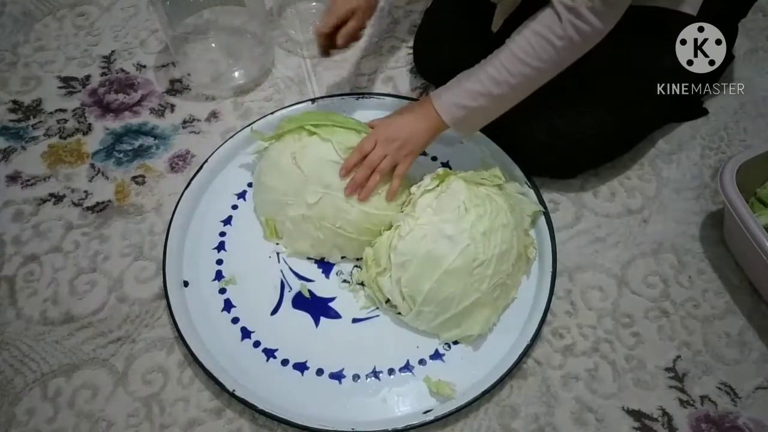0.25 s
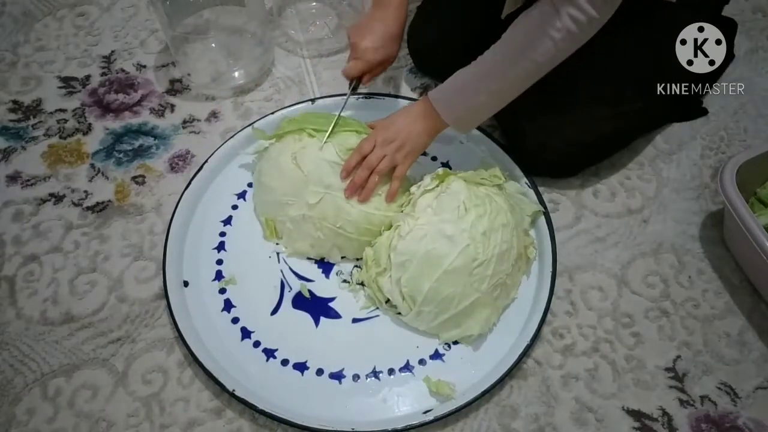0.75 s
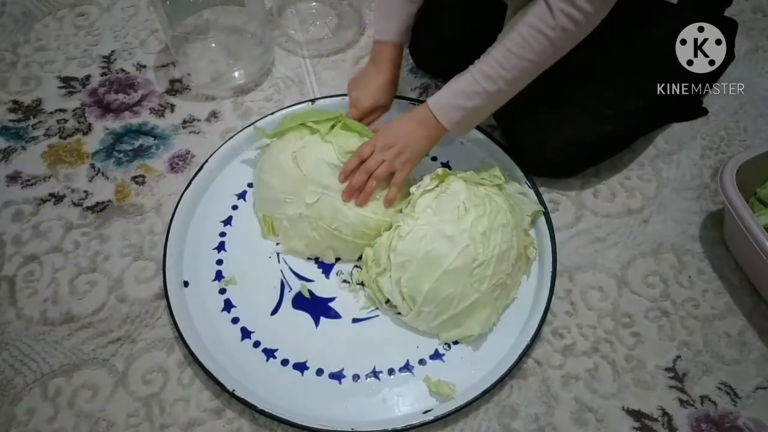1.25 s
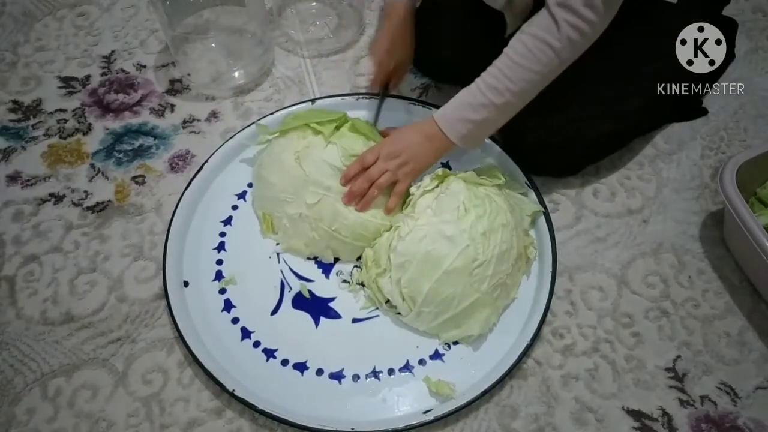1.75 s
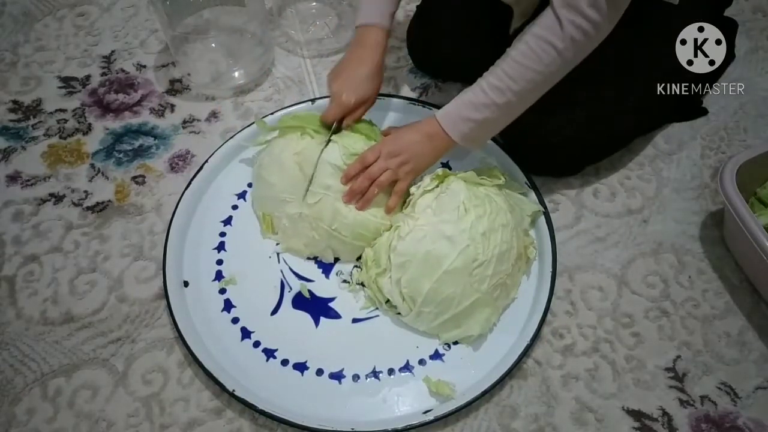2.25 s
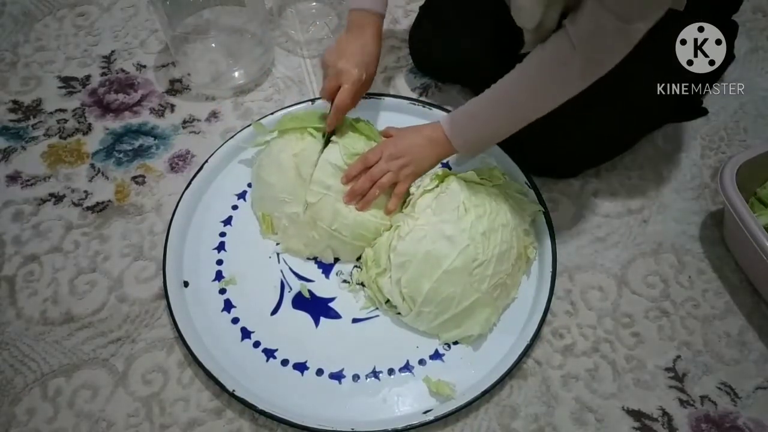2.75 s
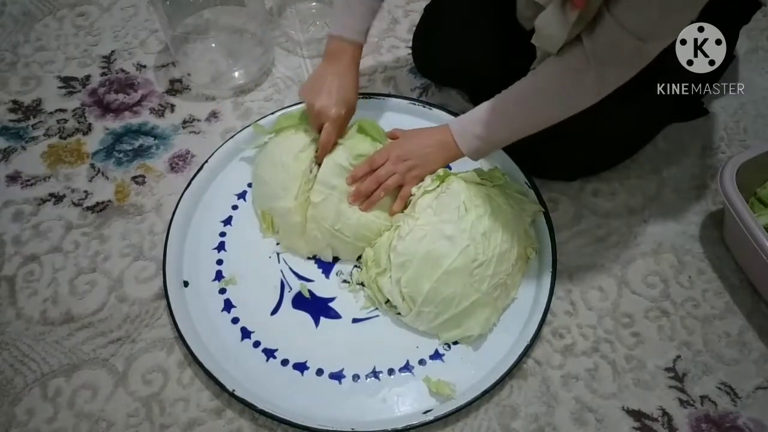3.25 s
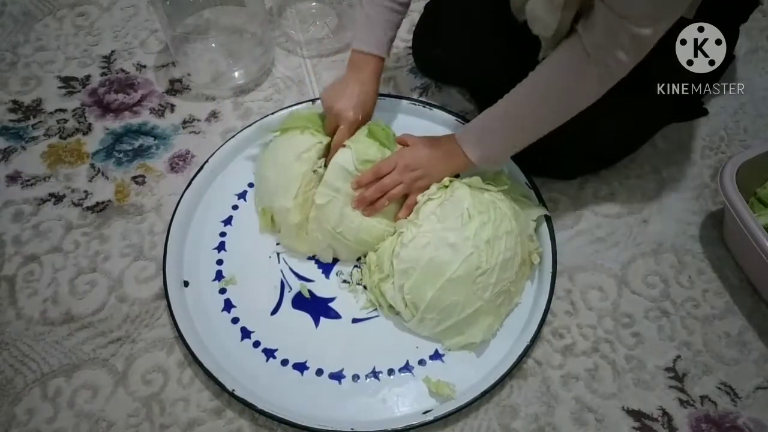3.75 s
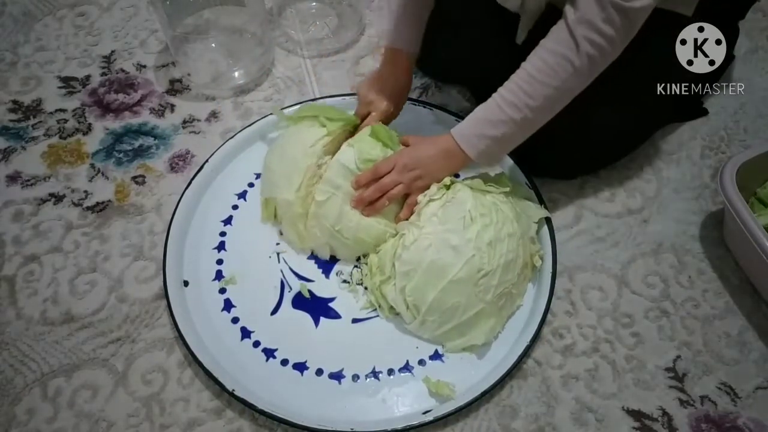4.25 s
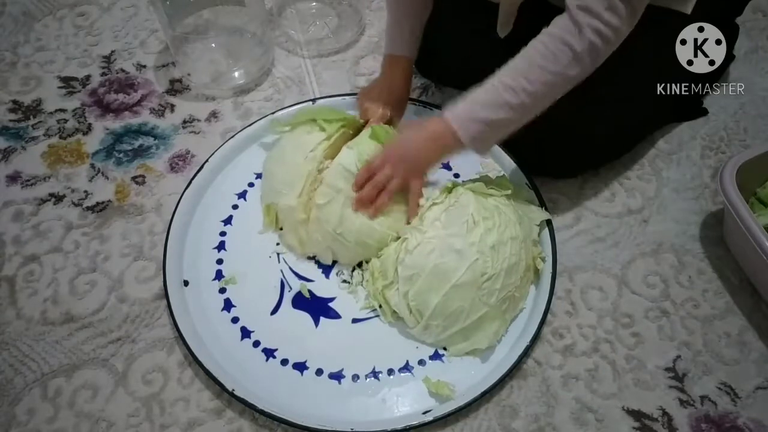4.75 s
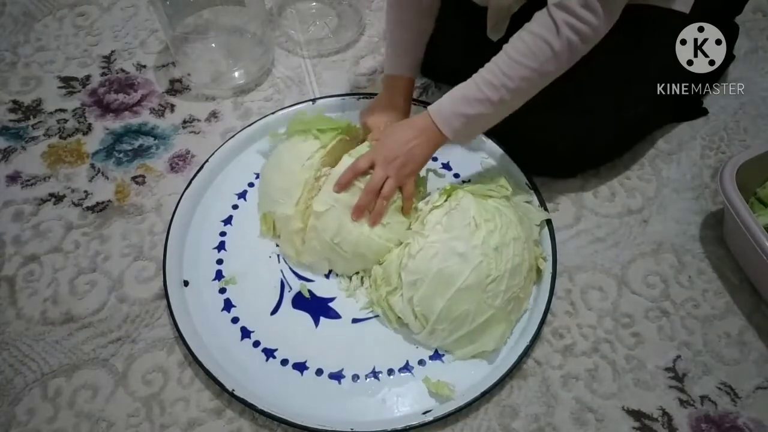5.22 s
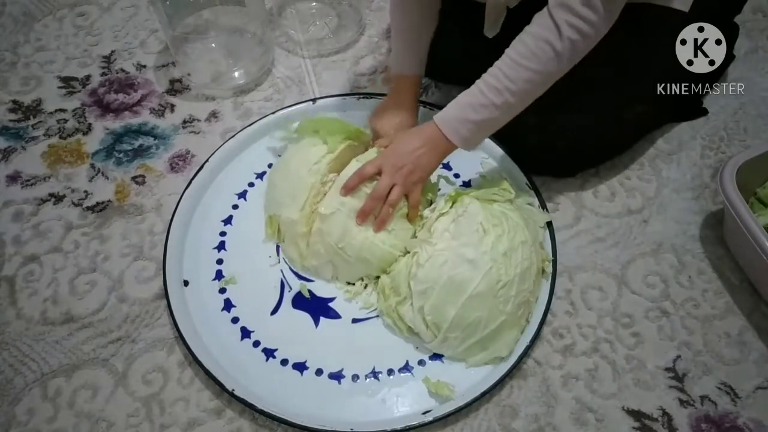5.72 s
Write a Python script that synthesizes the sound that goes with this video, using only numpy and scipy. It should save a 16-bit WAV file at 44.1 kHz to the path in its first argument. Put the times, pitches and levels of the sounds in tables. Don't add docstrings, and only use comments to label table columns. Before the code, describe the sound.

Close, dry stereo phone pickup of cabbage cutting indoors. Near silence with tiny crackles opens into heavy crunching, a short squeak and one overloading clang on a thin tray, followed by small buzzing bounces. After a few lighter stabs, regular juicy sawing continues to the end with cracks, hollow leaf resonances and dull low thumps. Treble dulls between strokes over faint room rumble and distant machine hum.

```python
import sys
import numpy as np
from scipy import signal
from scipy.io import wavfile
from scipy.ndimage import uniform_filter1d

SR = 44100
rng = np.random.default_rng(int(sys.argv[2]) if len(sys.argv) > 2 else 0)


def log_audio(samples):
    frames = np.atleast_2d(samples).T
    limited = np.clip(frames, -1, 1)
    pcm = np.round(limited * 32767).astype(np.int16)
    wavfile.write(sys.argv[1], SR, pcm)


def gain_from_db(level_db):
    decades = np.asarray(level_db, float) / 20
    return 10 ** decades


N = 263718


def rms_one(x):
    return x / np.sqrt(np.mean(x ** 2) + 1e-20)


def at_hz(points, hz):
    table = np.array(points)
    return np.interp(np.log(hz), np.log(table[:, 0]), table[:, 1])


def drift(rate_hz):
    r = np.exp(-128 * np.pi * rate_hz / SR)
    slow = signal.lfilter([1], [1, -2 * r, r * r], rng.standard_normal(N // 64 + 502))[500:]
    return np.interp(np.arange(N) / 64, np.arange(len(slow)), rms_one(slow))


def resonate(x, hz, width_hz):
    r = np.exp(-np.pi * width_hz / SR)
    poles = [1, -2 * r * np.cos(2 * np.pi * hz / SR), r * r]
    return signal.lfilter([(1 - r * r) / 2, 0, (r * r - 1) / 2], poles, x + 1e-18)


# (frequency [Hz], correlation [0-1])
LIKENESS = [(60, 0.82), (180, 1), (540, 0.72), (1640, 0.34), (4930, 0.37), (14800, 0.12)]
# (frequency [Hz], level [dB])
PORT_LEAN = [(60, 0), (500, 0), (2000, 1), (4000, 1.5), (6000, 5.5), (9000, -5), (12000, -16), (15000, -10)]


def spread(pair, hz):
    alike = np.clip(at_hz(LIKENESS, hz), 0, 1)
    lean_db = at_hz(PORT_LEAN, hz) / 2
    common = np.sqrt(1 + alike) * pair[0]
    difference = np.sqrt(1 - alike) * pair[1] * [[1], [-1]]
    return gain_from_db(np.array([[lean_db], [-lean_db]])) * (common + difference)


def cracks(per_s, uneven_db):
    sizes = gain_from_db(uneven_db * np.minimum(rng.exponential(1, (2, N)), 5)) * rng.choice([-1, 1], (2, N))
    return rms_one(sizes * (rng.random((2, N)) < per_s / SR))


def colour(sources, spectrum, low_hz, high_hz, shape=lambda hz: 1):
    edges = np.geomspace(low_hz, high_hz, 2 + int(4 * np.log2(high_hz / low_hz)))
    out = 0
    for k, band in enumerate(zip(edges, edges[1:])):
        hz = np.sqrt(band[0] * band[1])
        bandpass = signal.butter(2, band, "band", fs=SR, output="sos")
        pair = signal.sosfilt(bandpass, sources[k % 2])
        out = out + gain_from_db(at_hz(spectrum, hz)) * shape(hz) * spread(pair, hz)
    return out


# (time [s], hold [s], thud [dB], crunch [dB], crisp [dB])
STABS = [(0.119, 0.00016, -54.5, -58.5, -71), (0.725, 0, -44.5, -58.5, -69), (0.837, 0.04, -29.5, -33, -47),
         (0.974, 0.026, -46.5, -44, -62), (1.161, 0.033, -31.5, -31.5, -50), (1.226, 0, -34.5, -53, -53),
         (1.28, 0.024, -46.5, -48, -59.5), (1.455, 0.1, -35, -35.5, -53), (1.595, 0.036, -39, -64, -52),
         (1.692, 0.01, -69, -47, -49.5), (1.747, 0.038, -51.5, -42, -53), (1.841, 0.037, -52, -51, -87),
         (2.041, 0.0016, -49.5, -53.5, -68), (2.294, 0.042, -38.5, -39, -50.5),
         (2.371, 0.023, -41.5, -47.5, -58.5), (2.485, 0.062, -50, -54, -69),
         (2.634, 0.027, -51.5, -59, -69.5)]
# (time [s], hold [s], thud [dB], crunch [dB], crisp [dB])
STROKES = [(2.863, 0.048, -37.5, -38, -52), (3.002, 0.027, -49, -46, -59), (3.163, 0.023, -36, -38, -52),
           (3.288, 0.026, -47, -49.5, -63.5), (3.436, 0.02, -40, -43, -59.5), (3.615, 0, -41.5, -53, -70),
           (3.706, 0.06, -39, -38.5, -54.5), (3.826, 0.076, -48, -47, -60.5),
           (3.992, 0.028, -50, -42, -56.5), (4.139, 0.038, -53.5, -43.5, -70),
           (4.263, 0.094, -44, -45.5, -63), (4.424, 0.092, -43.5, -46.5, -89),
           (4.572, 0.074, -41.5, -43.5, -57.5), (4.742, 0.031, -45.5, -46, -78), (4.8, 0.06, -48, -48, -61),
           (4.891, 0.012, -39.5, -49, -78), (4.96, 0.026, -59, -45, -62.5), (5.111, 0.015, -45.5, -53, -70),
           (5.18, 0.0093, -36.5, -42, -59.5), (5.297, 0.031, -45, -50, -71),
           (5.453, 0.06, -37.5, -42, -61.5), (5.537, 0.049, -46, -47.5, -61), (5.78, 0.036, -41, -46, -67)]
CUTS = STABS + STROKES
# (time [s], level [dB])
PRESSURE = [(0.0, -73.5), (0.64, -69.5), (0.8, -58), (1.35, -64), (1.62, -44), (1.95, -72), (2.2, -60.5),
            (2.45, -55), (2.76, -70), (2.95, -53), (3.5, -52.5), (4.1, -50), (4.5, -64.5), (5.05, -58),
            (5.7, -55.5), (5.98, -60.5)]


def effort(peak_db, rise_db_s, fall_db_s, creak_db):
    start, hold = np.transpose(CUTS)[:2, :, None]
    jerk = np.exp(-np.abs(hold) / .017)
    t = np.arange(0, N, 32) / SR
    before = np.maximum(start - .017 * jerk - t, 0)
    after = np.maximum(t - start - hold, 0)
    level_db = peak_db[:, None] - rise_db_s * (1 + 2.1 * jerk) * before - fall_db_s * after
    creaking_db = np.interp(t, *np.transpose(PRESSURE)) + creak_db
    power = np.sum(gain_from_db(level_db) ** 2, axis=0) + gain_from_db(creaking_db) ** 2
    return np.interp(np.arange(N) / SR, t, 10 * np.log10(power))


# (frequency [Hz], width [Hz], level [dB])
HEAD = [(237, 25, 1), (283, 32, -7.5), (354.3, 23, -3), (444, 13, -8.5), (920, 120, -6), (1450, 22, -20.5),
        (2070, 240, -32.5)]


def tearing(catch, level_db, spectrum, low_hz, high_hz, per_s, uneven_db, patchy_db, head_db):
    clumps = gain_from_db(patchy_db * (.45 * catch + .55 * drift(30)))
    shower = [clumps * cracks(per_s, uneven_db), clumps * cracks(per_s, uneven_db)]
    out = rms_one(colour(shower, spectrum, low_hz, high_hz, lambda hz: gain_from_db(patchy_db * drift(7.8))))
    for k, (hz, width_hz, db) in enumerate(HEAD):
        if low_hz < hz < high_hz:
            comes_and_goes = gain_from_db(5 * np.tanh(drift(8)))
            ring = rms_one(resonate(shower[k % 2] * comes_and_goes, hz, width_hz))
            out += spread(ring, hz) * gain_from_db(db + head_db)
    return gain_from_db(level_db) * rms_one(out)


# (frequency [Hz], density [dB per Hz])
CRUNCH = [(71, -45), (120, 0), (171, -17.5), (210, -3.5), (328, 3), (397, -7), (449, -2), (508, -10.5),
          (875, -8), (1250, -10), (1430, -7), (2330, -12.5), (3100, -31.5), (4030, -59), (6820, -120)]
# (frequency [Hz], density [dB per Hz])
CRISP = [(1590, -31), (2700, -1), (3010, -8), (3770, -8.5), (4400, -8.5), (5400, -9.5), (6200, -11),
         (7510, -12.5), (9060, -20.5), (11000, -23), (13100, -28.5), (14600, -33.5), (15300, -34)]


def sawing():
    low_db, mid_db, high_db = np.transpose(CUTS)[2:]
    between_db = .41 * low_db + .59 * mid_db - 1.2
    thud_db = effort(low_db, rise_db_s=393.5, fall_db_s=193.5, creak_db=5.5)
    hollow_db = effort(between_db, rise_db_s=308, fall_db_s=225, creak_db=2)
    crunch_db = effort(mid_db, rise_db_s=303, fall_db_s=223, creak_db=.66)
    crisp_db = effort(high_db + 1.5, rise_db_s=301, fall_db_s=156, creak_db=-16.5)
    air_db = 1.4 * crisp_db - 7.5
    catch = drift(29.6)
    thud = tearing(catch, thud_db, CRUNCH, 127, 599.6, per_s=440, uneven_db=2, patchy_db=1.5, head_db=-9.5)
    hollow = tearing(catch, hollow_db, CRUNCH, 600, 1200, per_s=700, uneven_db=2.5, patchy_db=1.9, head_db=-12)
    crunch = tearing(catch, crunch_db, CRUNCH, 1200, 2900, per_s=1200, uneven_db=2, patchy_db=1.5, head_db=-12.5)
    crisp = tearing(catch, crisp_db, CRISP, 2860, 12000, per_s=12000, uneven_db=4, patchy_db=2, head_db=0)
    air = tearing(catch, air_db, CRISP, 12500, 14600, per_s=20000, uneven_db=4.5, patchy_db=5, head_db=0)
    return thud + hollow + crunch + crisp + air


# (time [s], peak [dB], pitch [Hz], thud [dB], crack [dB])
SNAPS = [(0.117, -42.5, 1310, -56, -68), (0.119, -47, 800, -62, -70), (0.709, -43, 800, -60, -68),
         (0.779, -36.5, 1010, -31, -51), (0.827, -28, 1000, -38, -43.5), (0.983, -33.5, 1716, -44, -55),
         (1.131, -28.5, 970, -35, -65), (1.837, -34, 1980, -52, -52.5), (1.851, -39.5, 1920, -49, -45),
         (1.899, -40.5, 1490, -49, -63.5), (1.9, -48, 795, -60, -69), (1.852, -39, 800, -60, -70),
         (2.027, -32.5, 1930, -48, -58), (2.031, -43, 776, -57, -72), (2.03, -38.5, 1243, -58, -70),
         (2.363, -33.5, 1670, -29, -50), (2.364, -31.5, 910, -60, -70.5), (2.571, -43, 1530, -37, -77.5),
         (2.985, -40.5, 1337, -69.5, -57), (3.146, -36, 1580, -31, -58), (3.21, -34, 2160, -32, -49.5),
         (3.339, -51, 1450, -52, -51), (3.601, -43, 1300, -45, -68), (4.345, -36.5, 1620, -38, -68),
         (4.413, -38, 890, -44, -72), (4.623, -30.5, 1960, -44, -59), (5.167, -42, 1110, -28.5, -65),
         (5.766, -31.5, 1020, -22.5, -64.5), (5.766, -22.5, 1710, -33, -59), (5.916, -43, 1950, -50, -60)]
# (time [s], peak [dB], pitch [Hz])
TICKS = [(.385, -52, 1800), (.968, -36, 2150), (.997, -35, 2440), (1.064, -41, 2100), (1.403, -46, 1500),
         (1.748, -39, 2000), (1.802, -41, 1800), (2.022, -38, 2200), (2.467, -41, 1500), (2.845, -37, 970),
         (2.881, -38, 885), (3.272, -42, 940), (4.011, -41, 1000), (4.106, -39, 2170), (4.457, -34, 880),
         (4.568, -45, 900), (4.804, -40, 1880), (4.873, -36, 970), (5.297, -41, 970), (5.418, -36.5, 1170),
         (5.454, -38, 1090), (5.873, -44, 1195), (2.66, -45, 1535), (2.705, -53, 1510),
         (2.777, -53.5, 1490), (3.413, -36, 1400), (3.563, -40, 1480), (3.7, -40, 1490), (4.146, -34, 1470),
         (4.239, -42, 1500), (4.533, -44, 1500), (4.953, -40, 1710), (5.159, -44, 1190),
         (5.39, -46.5, 1530)]
# (time [s], peak [dB], pitch [Hz])
BITES = [(0.774, -37, 1040), (0.842, -23, 964), (0.848, -28, 1600), (1.131, -30, 2500), (1.148, -26, 1460),
         (1.412, -33, 883), (1.443, -30, 920), (2.267, -37, 972), (2.288, -33, 880), (2.365, -26.5, 2600),
         (2.453, -40, 1000), (2.635, -44, 1205), (3.917, -33, 880), (3.964, -36, 869), (5.769, -25, 796)]


def snaps():
    sharp, soft, t = np.zeros(N), np.zeros(N), np.arange(SR // 20) / SR
    small = TICKS + [(s, db - 8, hz) for s, db, hz in BITES]
    breaks = SNAPS + [(s, db, hz, db - 16, db - 22.5) for s, db, hz in small]
    grit = rng.standard_normal((len(breaks), len(t)))
    for (s, db, hz, thud_db, crack_db), noise in zip(breaks, grit):
        crack = gain_from_db(crack_db + 1 - 5000 * t) * noise
        tick = gain_from_db(db + 6.5 - 4.1 * t * hz) * (1 - np.exp(-t / .0001))
        tick *= np.cos(2 * np.pi * hz * (t - .0002))
        thud = gain_from_db(thud_db - 2600 * t) * (1 - np.exp(-t / .0003)) * np.cos(2 * np.pi * 330 * t)
        at = round(s * SR)
        sharp[at:][:len(t)] += (crack + gain_from_db(-17) * tick)[:N - at]
        soft[at:][:len(t)] += (tick + thud)[:N - at]
    soft = signal.sosfilt(signal.butter(6, 2700, fs=SR, output="sos"), np.roll(soft, 12))
    return soft + signal.sosfilt(signal.butter(2, 9000, fs=SR, output="sos"), sharp)


# (time [s], peak [dB], pitch [Hz])
BUMPS = [(0.713, -30, 223), (0.841, -20.5, 223), (0.9, -25.5, 300), (1.15, -25, 346), (1.235, -27.5, 300),
         (2.9, -35, 330), (3.745, -33, 330), (4.635, -34.5, 402), (4.895, -34.5, 400), (5.475, -30, 350),
         (1.374, -31.5, 270), (1.48, -9.5, 371), (1.874, -45, 313), (2.171, -46.5, 330), (2.287, -31, 324),
         (2.363, -23.5, 253), (2.482, -36.5, 386), (2.533, -33.5, 345), (2.803, -48, 310),
         (2.869, -26, 275), (3.033, -38, 327), (3.121, -34.5, 280), (3.342, -32.5, 272), (3.432, -37, 282),
         (3.598, -30, 228), (3.694, -38, 326), (3.819, -32, 346), (3.87, -39, 291), (4.029, -34, 340),
         (4.171, -40, 270), (4.237, -46, 303), (4.324, -34, 279), (4.487, -38.5, 226), (4.582, -30, 275),
         (4.748, -39, 283), (4.88, -39, 236), (5.175, -27, 284), (5.442, -36.5, 377), (5.633, -46, 280),
         (5.765, -39, 371), (5.89, -45, 242)]


def bumps():
    out, t = np.zeros(N + SR), np.arange(SR // 10) / SR
    for s, db, hz in BUMPS:
        envelope = gain_from_db(db + 1 - 650 * t) * (1 - np.exp(-t / .0015))
        out[round(s * SR):][:len(t)] += envelope * np.sin(2 * np.pi * hz * t)
    return out[:N]


# (time [s], length [s], pitch [Hz], level [dB])
HOLLOWS = [(0.849, 0.049, 907, -35), (1.19, 0.023, 1605, -42), (2.285, 0.044, 960, -54),
           (2.873, 0.046, 890, -48), (3.158, 0.031, 1450, -42), (3.203, 0.014, 930, -45),
           (3.429, 0.037, 907, -47), (3.691, 0.06, 907, -44.5), (3.776, 0.037, 2070, -45),
           (3.972, 0.071, 890, -47), (4.154, .025, 1484, -45.5), (4.158, .03, 890, -47),
           (4.294, .05, 864, -50), (4.433, 0.056, 900, -47.5), (4.533, 0.028, 797, -44.5),
           (4.624, 0.018, 1670, -49.5), (5.434, 0.081, 1000, -49), (2.887, .02, 4300, -57),
           (3.01, .015, 3200, -52.5), (3.015, .025, 4600, -66), (2.843, .02, 2080, -50),
           (3.817, .015, 2430, -52), (2.362, .008, 4750, -57), (5.063, .02, 1600, -53),
           (5.625, .02, 2400, -57.5)]


def hollows():
    out, t = np.zeros((2, N)), np.arange(N) / SR
    grit = cracks(per_s=1500, uneven_db=1.9)
    for s, length_s, hz, db in HOLLOWS:
        near = slice(int((s - .06) * SR), int((s + length_s + .06) * SR))
        outside = np.maximum(np.abs(t[near] - s - length_s / 2) - length_s / 2, 0) / .01
        ring = resonate(grit[:, near], hz, max(60, hz / 20))
        out[:, near] += gain_from_db(db) * np.exp(-outside ** 2) * rms_one(spread(ring, hz))
    return out


# (time [s], pitch [Hz], level [dB])
SQUEAK = [
    (.955, 369.4, -55.5),
    (.97, 372, -44.5),
    (1.0, 375.3, -45.5),
    (1.015, 399, -47),
    (1.03, 464, -40),
    (1.06, 472, -42.5),
    (1.085, 469, -46.5),
    (1.12, 465, -51),
]


def squeak():
    first, last, t = SQUEAK[0], SQUEAK[-1], np.arange(N) / SR
    rows = [(first[0] - .015, first[1], -90)] + SQUEAK + [(last[0] + .02, last[1], -90)]
    s, pitch_hz, db = np.transpose(rows)
    phase = 2 * np.pi * np.cumsum(np.interp(t, s, pitch_hz)) / SR
    height = gain_from_db(-600 * np.maximum(np.abs(t - 1.042) - .02, 0))
    overtones = gain_from_db(-9) * np.sin(2 * phase) + gain_from_db(-13.5) * np.sin(3 * phase)
    return np.sqrt(2) * gain_from_db(np.interp(t, s, db)) * (np.sin(phase) + height * overtones)


# (frequency [Hz], level [dB], t60 [s])
TRAY_LOW = [(242, -3, .2), (275, -1, .25), (312, -3, .25), (330, -5, .33), (376.5, -9, .33), (449, -8, .33)]
# (frequency [Hz], level [dB], t60 [s])
TRAY = [(867, -3, .26), (967, -11, .2), (1190, -17, .15), (1468, -5, .26), (1561, -10, .3), (1605, -5, .45),
        (1778, -4, .28), (1880, -2, .2), (1928, -4, .25), (2105, -2, .4), (2202, -6, .4), (2260, -7, .34),
        (2580, -16, .24), (3090, -21, .2), (3382, -21, .4), (5450, -24, .25), (6896, -24, .3),
        (7515, -22, .22)]
# (frequency [Hz], density [dB per Hz])
CLATTER = [(59, -56), (100, -27), (312, -3), (624, -13.5), (693, -17.5), (874, -9), (1330, -12.5),
           (1450, -8), (2160, -9), (2780, -19.5), (4320, -27.5), (7630, -25.5), (8300, -31.5), (10900, -32),
           (15300, -44.5)]
# (frequency [Hz], t60 [s])
CLATTER_T60 = [(60, 0.2), (300, 0.33), (1000, 0.23), (3000, 0.26), (8000, 0.23), (14000, 0.11)]
# (push [full scale], decay [s], swing back [full scale], decay [s])
JOLT = [(1.15, .033, .36, .14), (.47, .044, .09, .14)]


def knock():
    t = np.maximum(np.arange(N) / SR - 1.4816, 0)
    ring = np.zeros((2, N))
    for hz, db, t60_s in TRAY_LOW + TRAY:
        phase = rng.uniform(0, 2 * np.pi, (2, 1))
        ring += gain_from_db(-18.5 + db - 60 * t / t60_s) * spread(np.sin(2 * np.pi * hz * t + phase), hz)
    white = rng.standard_normal((2, 2, N))
    undamped_rms = np.std(colour(white[:, :, :SR // 2], CLATTER, 60, 15900))
    clatter = colour(white, CLATTER, 58.2, 15950, lambda hz: gain_from_db(-60 * t / at_hz(CLATTER_T60, hz)))
    tick = -.9 * np.exp(-((t - .0007) / .00018) ** 2)
    jolt = np.array([push * np.exp(-(t / push_s) ** 1.3) - back * np.exp(-(t / back_s) ** 1.6)
                     for push, push_s, back, back_s in JOLT])
    struck = (1 - np.exp(-t / .0002)) * (ring + gain_from_db(-8) * clatter / undamped_rms + tick)
    return struck + (1 - np.exp(-t / .003)) * jolt


# (time [s], buzz [dB], bright [dB])
RATTLE = [
    (1.625, -38.5, -58.5),
    (1.683, -37.5, -47.5),
    (1.703, -44, -58),
    (1.7209, -38, -59.5),
    (1.7474, -36.5, -46),
    (1.7685, -41, -54),
    (1.787, -51, -67),
    (1.801, -55, -71),
]
# (frequency [Hz], width [Hz], level [dB])
BUZZ = [(1530, 110, -11.5), (1880, 71, 0), (2190, 110, -1), (3640, 500, -20)]
# (frequency [Hz], width [Hz], level [dB])
BRIGHT = [(5230, 940, -5.5), (7000, 1080, -7), (10620, 2600, -7)]


def rattle():
    t = np.arange(N) / SR
    touches = cracks(per_s=6000, uneven_db=2)
    out = np.zeros((2, N))
    for column, fall_db_s, peaks in ((1, 504, BUZZ), (2, 260, BRIGHT)):
        loud = sum(gain_from_db(row[column] - fall_db_s * np.clip(t - row[0], 0, 1)) * (t > row[0]) for row in RATTLE)
        for hz, width_hz, db in peaks:
            ring = resonate(resonate(touches, hz, width_hz), hz, 2 * width_hz)
            out += gain_from_db(db) * loud * rms_one(spread(ring, hz))
    return out


def room(x):
    t60_s, wall_cut_hz = .45, 6600
    out, dull = np.zeros((2, N)), np.exp(-2 * np.pi * wall_cut_hz / SR)
    for k, lag in enumerate((rng.uniform(.006, .03, 16) * SR).astype(int)):
        loop, gain, state = x.copy(), gain_from_db(-60 * lag / SR / t60_s), [0.]
        for i in range(lag, N, lag):
            back, state = signal.lfilter([gain * (1 - dull)], [1, -dull], loop[i - lag:i], zi=state)
            loop[i:i + lag] += back[:N - i]
        out[k % 2] += (loop - x) * (-1) ** (k // 2)
    return out


# (frequency [Hz], density [dB per Hz])
FLOOR = [(5.9, -33), (10, 3), (30, -10), (65, -10), (102, -6.5), (127, -13), (189, -28), (220, -21),
         (290, -21.5), (327, -9.5), (418, -37.5), (502, -16), (585, -21), (1990, -35.5), (3670, -73),
         (15000, -82)]
# (frequency [Hz], width [Hz], level [dB])
HUM = [(231, 14, -62), (330, 6, -59), (393, 8, -68), (442, 14, -66), (495, 6, -66)]


def room_tone():
    white = rng.standard_normal((2, 2, N + SR))
    out = gain_from_db(-52.5) * rms_one(colour(white, FLOOR, 9.93, 15240))
    for hz, width_hz, db in HUM:
        narrow = resonate(resonate(white[0], hz, width_hz), hz, width_hz)
        out += gain_from_db(db) * spread(rms_one(narrow), hz) / np.sqrt(2)
    mains_db = -56.5 + .78 * drift(4)
    mains_hz = 99.3 + .9 * drift(2.8)
    mains = gain_from_db(mains_db) * np.sin(2 * np.pi * np.cumsum(mains_hz) / SR)
    return out[:, SR:] + np.sqrt(2) * mains


def scene():
    single = snaps() + squeak() + bumps()
    near = sawing() + knock() + rattle() + hollows() + single + gain_from_db(-21) * room(single)
    near[0] = np.roll(near[0], 3)
    return near + room_tone()


# (from [s], to [s])
OPEN = [(.113, .138), (.712, .73), (.76, 1.03), (1.112, 1.345), (1.415, 1.877), (1.89, 1.908),
        (2.018, 2.046), (2.13, 2.178), (2.195, 2.446), (2.464, 2.543), (2.7, 2.706), (2.815, 3.071),
        (3.108, 3.354), (3.404, 3.498), (3.545, 3.624), (3.662, 4.079), (4.094, 4.2), (4.238, 4.372),
        (4.405, 4.452), (4.484, 4.687), (4.738, 4.914), (4.95, 5.024), (5.096, 5.227), (5.29, 5.33),
        (5.422, 5.633), (5.657, 5.666), (5.765, 5.839), (5.917, 5.926)]


def treble_gate(x):
    edge_hz, gate_db, gate_s, sink_db, sink_s = 3550, -12.5, .012, -7, .08
    t = np.arange(N) / SR
    shut = 1. - sum((t > start) & (t < end) for start, end in OPEN)
    keep = np.exp(-1 / (sink_s * SR))
    long_shut = signal.lfilter([1 - keep], [1, -keep], shut, zi=[keep])[0]
    gain_db = uniform_filter1d(shut * (gate_db + sink_db * long_shut), size=int(gate_s * SR))
    low = signal.sosfiltfilt(signal.cheby2(7, 30, edge_hz, fs=SR, output="sos"), x)
    return low + gain_from_db(gain_db) * (x - low)


def low_pass(x):
    return signal.sosfilt(signal.butter(12, 15430, fs=SR, output="sos"), x)


# (frequency [Hz], width [Hz], level [dB])
PORT_PEAKS = [(7475, 780, 7), (10660, 640, -6)]


def record(dry):
    ports = np.array([x + gain_from_db(db) * resonate(x, hz, width_hz)
                      for x, (hz, width_hz, db) in zip(dry, PORT_PEAKS)])
    hissing = treble_gate(ports) + gain_from_db(-85) * rng.standard_normal(dry.shape)
    dull = signal.sosfilt(signal.butter(2, 13500, fs=SR, output="sos"), hissing)
    clipped = np.clip(dull, -.99, .99)
    mix = signal.sosfiltfilt(signal.cheby2(16, 30, 15600, fs=SR, output="sos"), clipped)
    return low_pass(mix)


dry = scene()
out = record(dry)
log_audio(out)
```